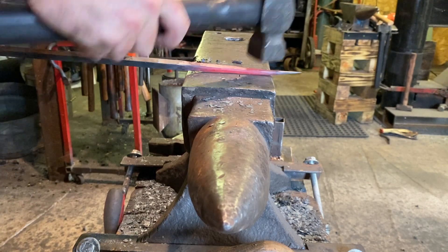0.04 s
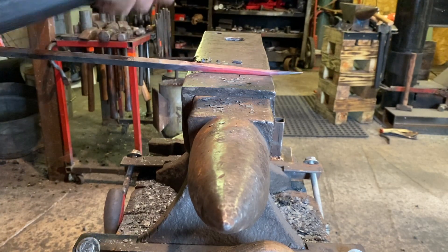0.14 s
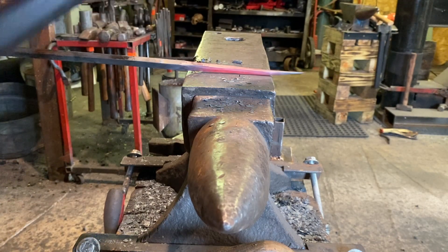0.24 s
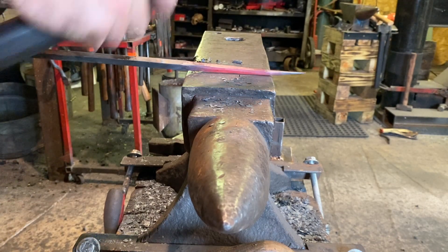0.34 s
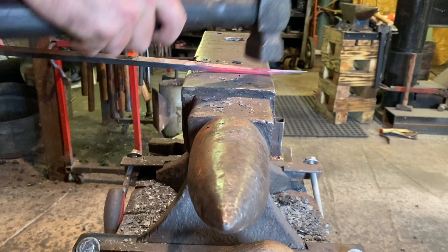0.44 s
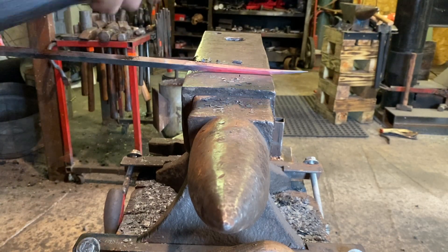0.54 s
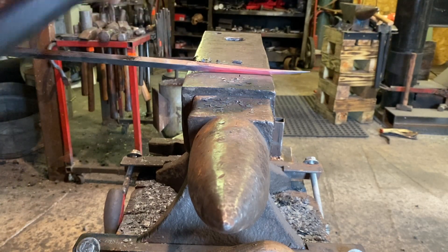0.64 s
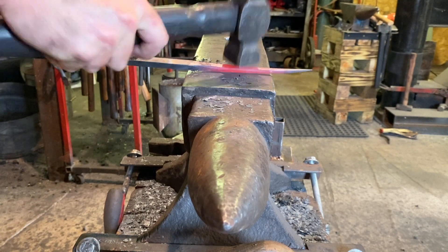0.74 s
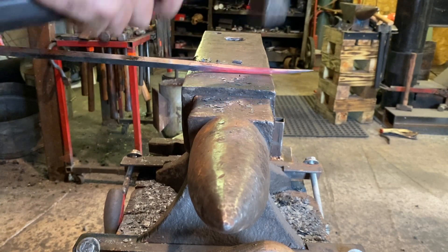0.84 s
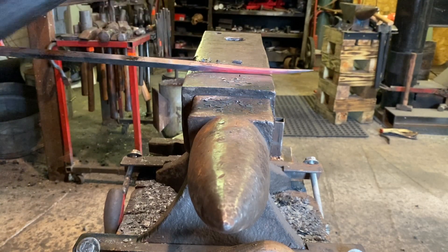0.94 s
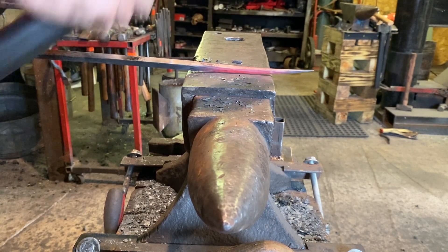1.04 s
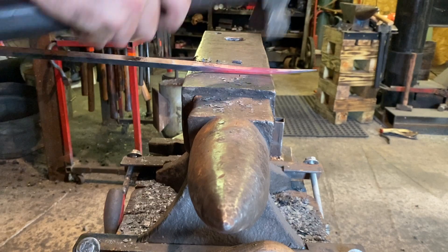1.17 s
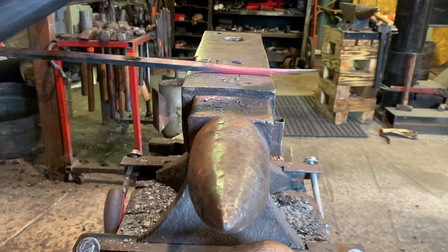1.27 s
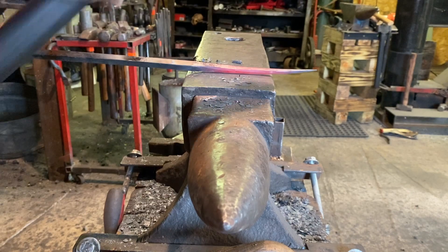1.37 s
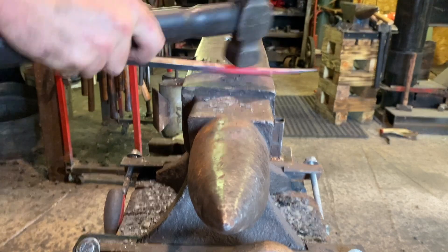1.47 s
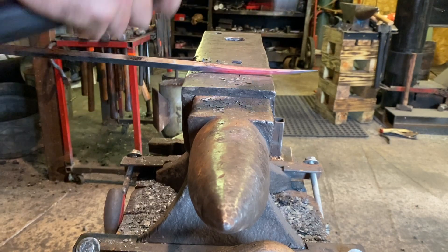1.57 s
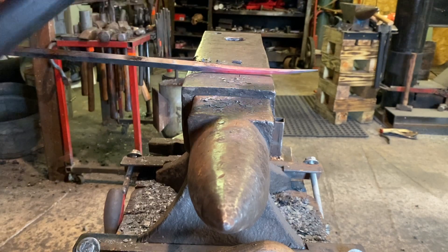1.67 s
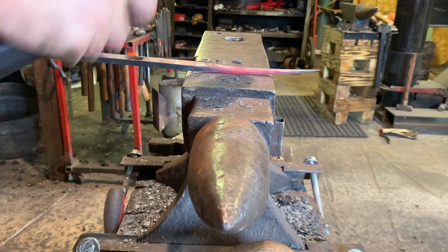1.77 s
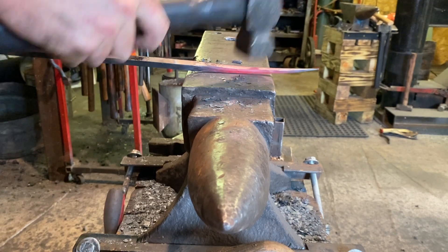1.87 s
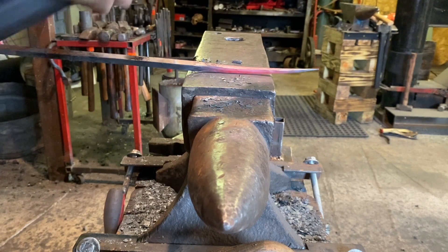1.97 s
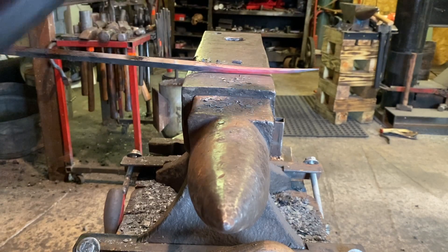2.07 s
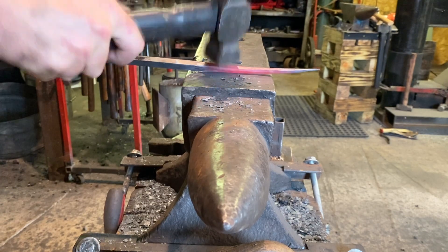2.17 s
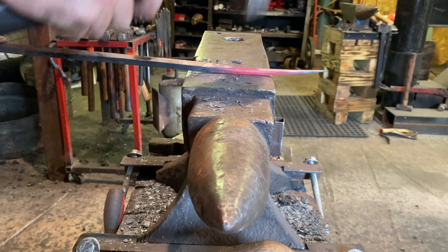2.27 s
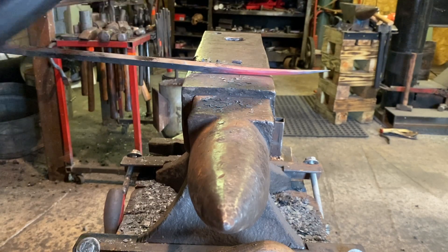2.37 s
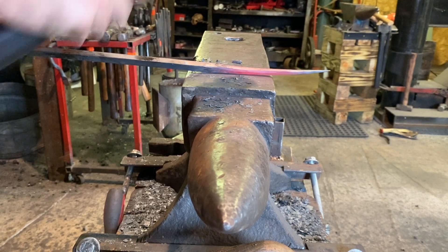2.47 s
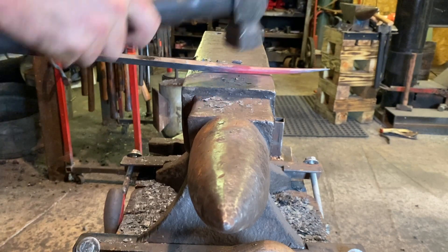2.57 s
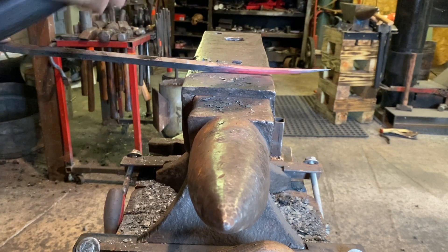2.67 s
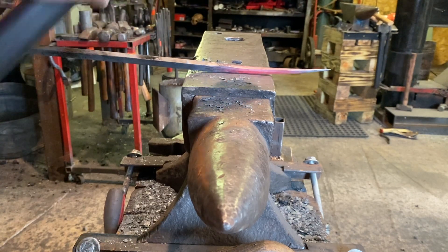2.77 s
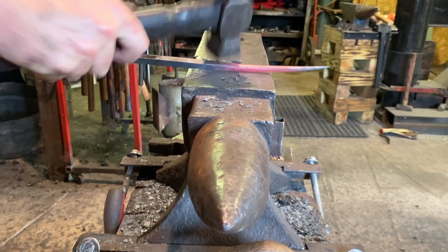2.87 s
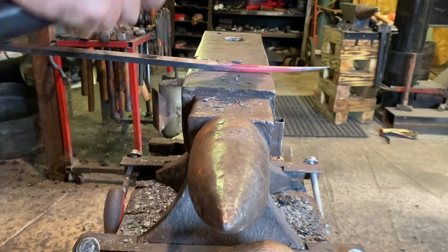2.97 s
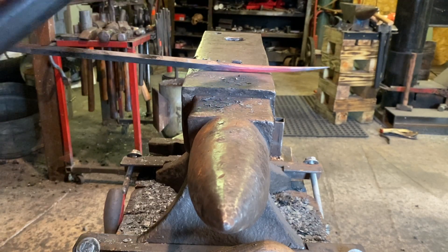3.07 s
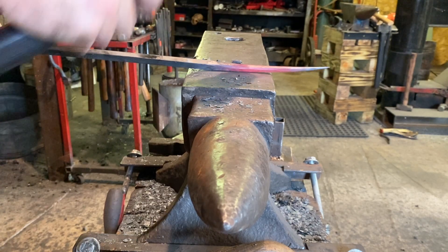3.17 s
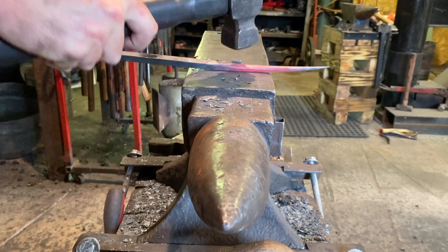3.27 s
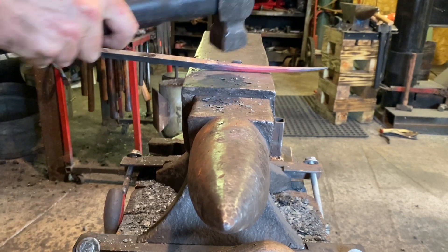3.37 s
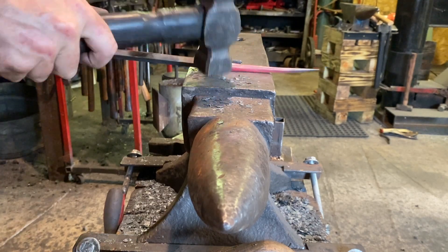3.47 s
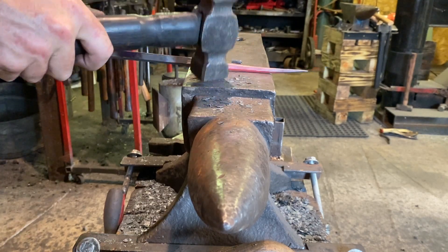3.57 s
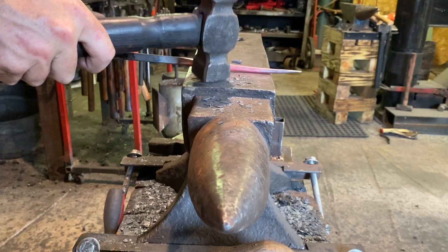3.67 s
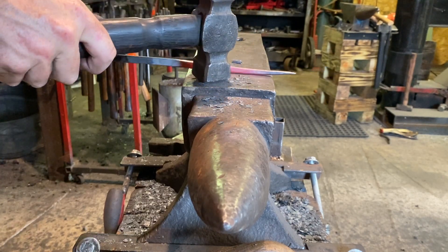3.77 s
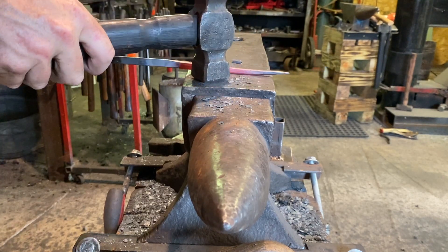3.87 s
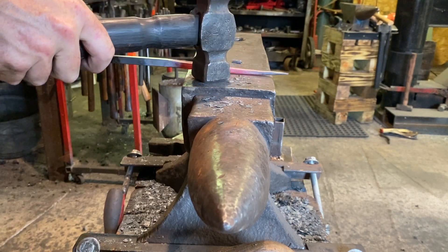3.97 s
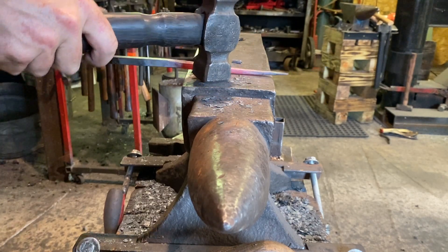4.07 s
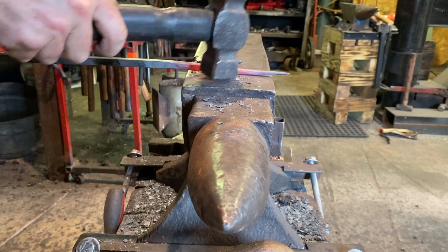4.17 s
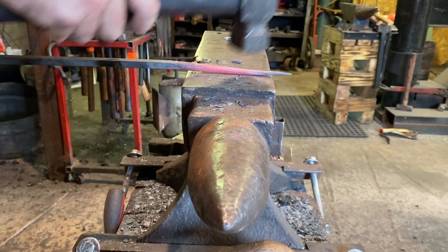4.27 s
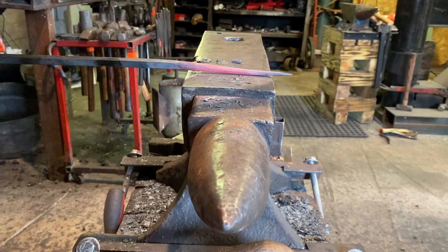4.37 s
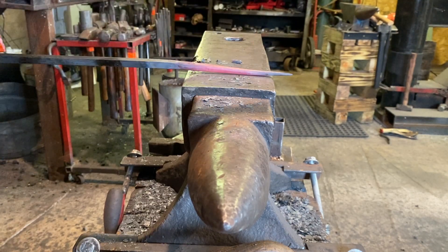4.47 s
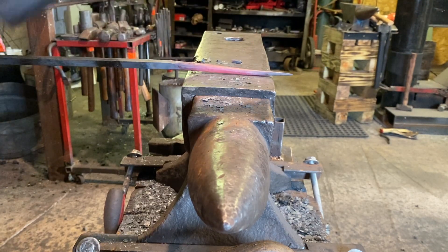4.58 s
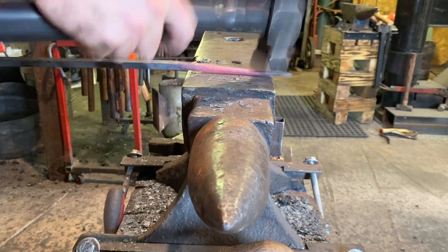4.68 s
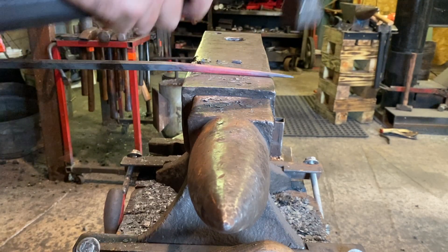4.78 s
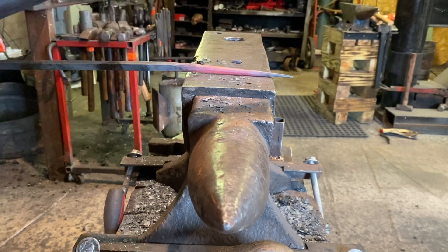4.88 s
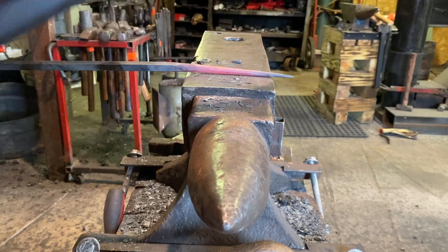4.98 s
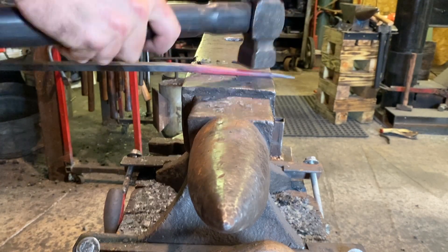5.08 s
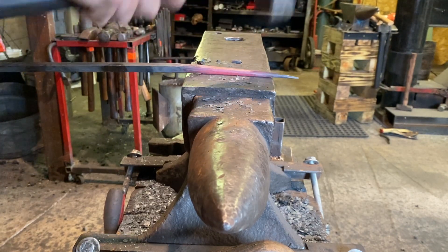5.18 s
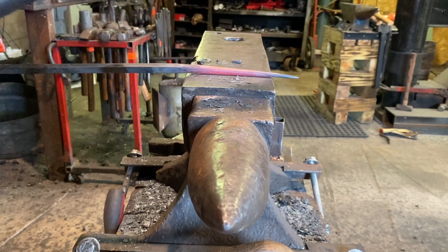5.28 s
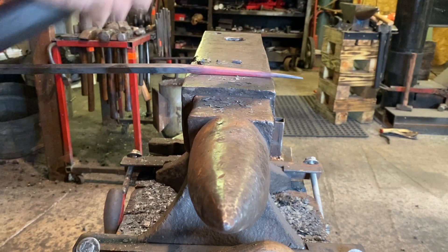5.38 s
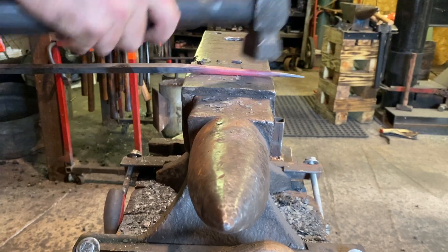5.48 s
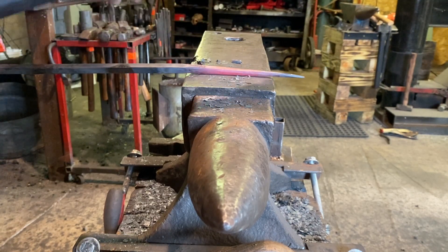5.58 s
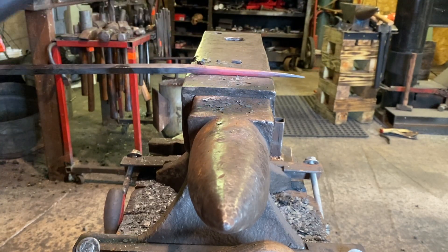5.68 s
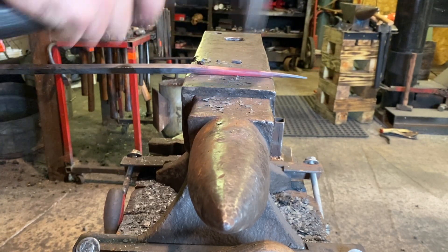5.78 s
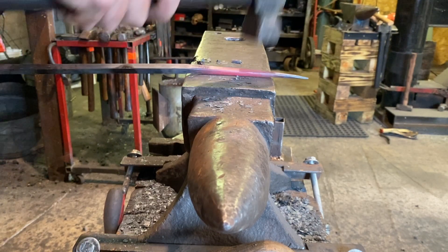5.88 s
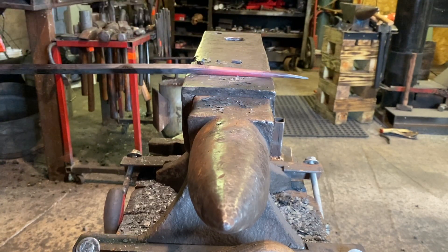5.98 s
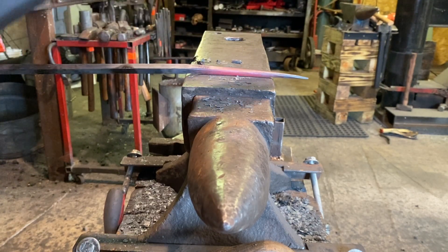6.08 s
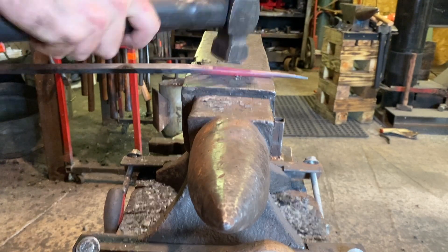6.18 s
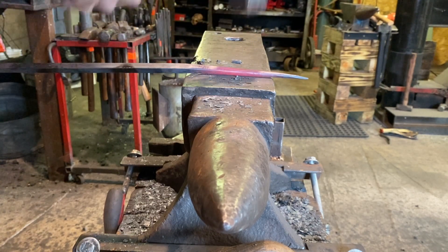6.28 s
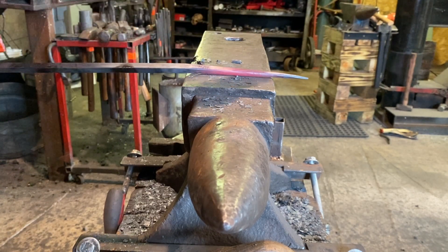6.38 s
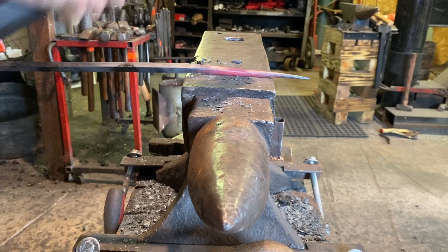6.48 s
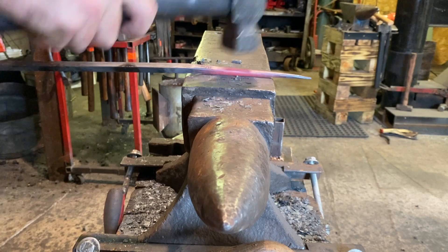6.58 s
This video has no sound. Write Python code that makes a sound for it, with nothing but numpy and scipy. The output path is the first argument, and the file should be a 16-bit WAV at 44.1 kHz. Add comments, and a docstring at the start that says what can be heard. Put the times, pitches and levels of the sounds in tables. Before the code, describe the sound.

Ten evenly spaced hammer blows on hot steel, sharp and heavy with short metallic ring, weaken slightly toward the end. The hammer then taps the bare anvil four times, ringing clearer, each bounce faster and softer. Near-silence follows with faint low thumps, and a second, slightly slower run of six blows begins. Close stereo microphone, hard-surfaced workshop with a short diffuse tail and quiet low room tone.

```python
"""A cluttered forge, heard close to the anvil: a hand hammer draws out a hot steel bar.
Each blow layers a noise crack and its floor reflection, a dead knock, a pitch-falling thud through the
stand, a short clang of decaying anvil modes, and a noise tail in which the workshop answers.
Between two runs the hammer drops on the bare anvil face and bounces ever faster and softer.
Soft low bumps mark the shifting of the bar; a faint steady rumble of coloured noise lies under it all."""
import sys
import numpy as np
from scipy import signal
from scipy.fft import rfft, irfft, next_fast_len
from scipy.io import wavfile
from scipy.ndimage import map_coordinates

SR = 44100
rng = np.random.default_rng(int(sys.argv[2]) if len(sys.argv) > 2 else 0)


def inscribe(sig):
    """Save sig as 16-bit PCM at rate SR to the path in sys.argv[1].

    A 1-D sig is mono; a 2-D sig holds one channel per row.
    Samples are clipped to [-1, 1] before scaling.
    """
    pcm = np.round(np.clip(np.atleast_2d(sig).T, -1, 1) * 32767)
    wavfile.write(sys.argv[1], SR, pcm.astype(np.int16))


N = 292383  # samples in the scene
LIFE = np.arange(int(.8 * SR)) / SR  # time axis of one hit, s

# Blows on the bar; the spot struck decides the bite and how strongly the two clear tones speak:
# start_s, force_db, bite_db, low_tone_db, high_tone_db (the tones are offsets to CLEAR_TONES)
BLOWS = [(0, 2.5, -1, -14.5, 0), (0.3606, -0.5, -4, 2, 8.5), (0.722, 2, -2, -13, 9),
         (1.0805, 1, 1, -17, 3.5), (1.438, 3.5, -2.5, 8.5, -17), (1.793, 2.5, 0.5, 4.5, 9),
         (2.1599, -3.5, -0.5, -3.5, 9), (2.5089, -2, -1, 7, 11), (2.8547, -4.5, -2, 3.5, 6.5),
         (3.2013, -4, -2.5, -10.5, 8.5), (4.6713, 2.5, 1, -3, 3.5), (5.0506, 2, -1, 8, 4),
         (5.42, 3, -4.5, -8.5, 8.5), (5.7906, 2.5, 0, 8.5, 7), (6.1527, -1, 0.5, 4, 7),
         (6.5215, -1.5, 0.5, 1, 10.5)]
# Colour of a blow of ordinary force: freq_hz, gain_db
BLOW_COLOUR = [(90, -3.5), (180, 0), (330, -1.5), (700, 0), (1100, 0.5), (1600, 1), (2000, -1), (2600, 0.5),
               (3800, 0), (5000, 2), (6500, 0)]
# A harder blow sinks deeper into the soft bar and sounds duller: freq_hz, gain_db_per_force_db
DULLING = [(110, -0.42), (300, -0.14), (1100, 0), (1900, -0.32), (3500, -1.19), (4800, -0.86),
           (10000, -0.65)]
# Where the bite lies in the spectrum: freq_hz, share_of_bite_db
BITE = [(2400, 0), (3200, 1), (3900, 1), (4600, 0)]
# After a harder blow the workshop's long tail is shorter
SHORTENING_PER_DB = 0.0548  # exponent of the shortening, per dB of force

# The hammer let fall on the bare face: first contact (s), its force (dB), force lost per bounce (dB)
DROP_S, DROP_DB, BOUNCE_LOSS_DB = 3.448, -3.5, 3
FLIGHT_S, REBOUND = .118, .577  # first flight (s), each flight over the last
# Clear tones: offset at first contact (dB), loss per bounce (dB); then factor on the long tail's length
DROP_TONES_DB, TONES_LOSS_DB, DROP_LINGER = 14, 2, 0.82
# Slower contacts last longer and lose their treble: freq_hz, first_contact_db, change_db_per_bounce
DROP_COLOUR = [(110, -6, 0.5), (300, -1, 0), (750, -3, -0.5), (970, 1, 1.3), (1690, -1.5, -0.6),
               (2420, 0, .3), (3130, 1.5, 0.5), (4010, 3.5, -0.5), (4560, 0, -1.5), (10000, -3, -4.5)]

# Modes of the anvil, damped by bar and stand, before their scatter from hit to hit:
# pitch_hz, level_db, t60_s, bare_face_extra_db
ANVIL_MODES = [(215, -34, .08, -3), (292, -33, .17, -5), (360, -34, .17, -3), (505, -35, .1, -3),
               (650, -29, .11, -3), (829, -32, .15, -3), (955, -43, .17, 13), (1000, -45, .12, 12),
               (1333, -37, .14, 0), (1617, -21, .18, -5), (1759, -24, .1, 0), (1903, -27, .14, 0),
               (1952, -28, .15, 0), (1981, -31, .18, 0), (2075, -33, .17, 2), (2128, -31, .17, 0),
               (2206, -31, .2, 0), (2316, -35, .25, 9), (2515, -36, .2, 0), (3220, -42, .22, 11),
               (3412, -36, .12, 0), (3515, -41, .25, 13), (3640, -39, .16, 10), (3738, -34, .24, 7),
               (3830, -44, .14, 12), (4165, -44, .16, 14), (5233, -40, .2, -4), (7724, -40, .22, 3),
               (9145, -38, .2, 0), (11330, -44, .2, 0)]
# The two clear tones of the hard steel, before each hit's offset: pitch_hz, level_db, t60_s
CLEAR_TONES = [(4136, -35, .24), (7234, -33.5, .17)]
LIFT_OFF_S = .0055  # how long the hammer stays in contact
# Spectrum of the contact crack: freq_hz, gain_db
CRACK_COLOUR = [(40, -30), (150, -20.5), (400, 1), (800, -3), (1200, -3.5), (2000, 2.5), (2800, -1.5),
                (3500, 7.5), (4500, -6), (8800, -2), (11500, -3), (14000, -12), (16000, -19.5)]
# The crack as the floor returns it: freq_hz, gain_db
FLOOR_COLOUR = [(100, 1.5), (300, -1.5), (700, -4), (1200, -5), (1800, -1.5), (3000, -9.5), (12000, -17)]
# Dead knock of the soft hot bar: pitch_hz, level_db, t60_s
KNOCK_MODES = [(313, -18, 0.023), (580, -16.5, 0.026), (669, -11.5, .016)]

# Long tail of the workshop, before each hit's length factor: freq_hz, t60_s
WORKSHOP_DECAY = [(80, 1.15), (300, 0.6), (1000, 0.7063), (2000, 0.68), (4000, 0.71), (7500, 0.68),
                  (11000, 0.4567), (16000, 0.3)]
# Spectrum of the workshop's wash: freq_hz, gain_db
WALL_COLOUR = [(30, -29), (80, -21.5), (180, -26.5), (300, -16.5), (550, -21), (850, -19), (1250, -23.5),
               (2100, -13.5), (2800, -24.5), (3700, -23.5), (4600, -32.5), (9000, -32.5), (12500, -32),
               (16000, -47)]
# Uneven colour of the workshop's wash in the treble: depth (dB), spacing (Hz)
RIPPLE_DB, RIPPLE_HZ = 3, 110

# Soft low bumps while the bar is shifted: start_s, level_db
BUMPS = [(4.479, -51), (4.545, -39.5), (4.594, -32.5), (4.944, -39)]
# Spectrum of the still workshop, before its overall level: freq_hz, gain_db
ROOM_COLOUR = [(15, -64.5), (25, -30), (70, 7), (123, -16), (145, 3.5), (185, -8.5), (263, 0), (293, -6),
               (439, -0.5), (575, -9.5), (3620, -26.5), (16000, -49)]
# How alike the two sides of the noise are: freq_hz, correlation
SIDE_LIKENESS = [(100, .92), (300, 0.8), (900, 0.1), (2000, 0.34), (4200, 0.8), (6000, 0.82)]
# Balance of the two sides: freq_hz, left_minus_right_db
SIDE_LEAN = [(100, -0.5), (380, -2), (900, 0.5), (1700, -0.5), (2600, 1.5), (5000, 6), (7000, 4),
             (8000, -5.3), (12000, 0)]


def hammering(crack_db=-7, thud_db=-28, knock_delay=.002):
    """Every contact drives the same anvil and room; force and spot change its colour."""
    out = np.zeros((2, N))
    usual_contact, usual_paths = pair(len(LIFE)), pair(len(LIFE))
    upper_modes, uneven = shimmer(), ripple()
    # the steel rings freely once the hammer lifts off
    tones = np.array([ring(hz, t60, 0.00054, LIFT_OFF_S)
                      for hz, _, t60, *_ in ANVIL_MODES + CLEAR_TONES])
    body = knock(knock_delay) + amp(thud_db) * thud()
    for start_s, force_db, colour, tone_dbs, linger, bare in blows() + bounces():
        modes = struck_modes(tone_dbs, bare)
        contact = amp(crack_db) * with_floor(crack(varied(usual_contact)))
        steel = clang(modes, tones, upper_modes, bare)
        answer = workshop(varied(usual_paths), modes, linger, uneven)
        hit = contact + body + steel + answer
        add(out, start_s, amp(force_db) * coloured(hit, colour))
    return out


def blows():
    """Working blows, where force sets colour and tail: start, force, colour, tones, tail factor, bare."""
    def colour(force_db, bite_db):
        return [(hz, along(BLOW_COLOUR, hz) + force_db * along(DULLING, hz) + bite_db * along(BITE, hz))
                for hz in np.geomspace(100, 12000, 40)]
    return [(start_s, force_db, colour(force_db, bite_db), tone_dbs,
             np.exp(-SHORTENING_PER_DB * force_db), False)
            for start_s, force_db, bite_db, *tone_dbs in BLOWS]


def bounces(count=4):
    """The dropped hammer bounces ever faster, softer and duller; rows as for the blows."""
    # each flight is a fixed fraction of the last, so the times form a geometric sum
    times = DROP_S + FLIGHT_S * (1 - REBOUND ** np.arange(count)) / (1 - REBOUND)
    rows = []
    for k, start_s in enumerate(times):
        colour = [(hz, db + slope * k) for hz, db, slope in DROP_COLOUR]
        tone_dbs = [DROP_TONES_DB - TONES_LOSS_DB * k] * len(CLEAR_TONES)
        rows.append((start_s, DROP_DB - BOUNCE_LOSS_DB * k, colour, tone_dbs, DROP_LINGER, True))
    return rows


def crack(grain, length=0.0064, rise=.0005):
    """Scale shatters and steel is squeezed for the few milliseconds of contact: a shaped noise burst."""
    burst = grain * (1 - np.exp(-LIFE / rise)) * np.exp(-(LIFE / length) ** 2)
    return coloured(burst, CRACK_COLOUR)


def with_floor(sound, delay=.0055):
    """The sound and its first reflection, from the floor below the anvil."""
    reflection = coloured(sound, FLOOR_COLOUR)
    return sound + filtered(reflection, lambda hz: np.exp(-2j * np.pi * hz * delay))


def struck_modes(tone_dbs, bare, scatter_db=3.5):
    """The steel's modes for one hit; anvil levels scatter, and the bare face shifts them."""
    modes = [(hz, db + bare * extra + scatter_db * rng.normal(), t60)
             for hz, db, t60, extra in ANVIL_MODES]
    modes += [(hz, db + extra, t60) for (hz, db, t60), extra in zip(CLEAR_TONES, tone_dbs)]
    return modes


def clang(modes, tones, upper_modes, bare, sides_db=2, shimmer_db=-47, shimmer_scatter_db=4,
          bare_shimmer_db=5):
    """Anvil and clear tones ring together under a shimmer of weak upper modes."""
    # each mode reaches the two sides unequally
    mode_dbs = np.array([db for _, db, _ in modes]) + sides_db * rng.standard_normal((2, len(modes)))
    upper_dbs = shimmer_db + bare * bare_shimmer_db
    upper_dbs = upper_dbs + shimmer_scatter_db * rng.standard_normal(len(upper_modes))
    return amp(mode_dbs) @ tones + amp(upper_dbs) @ upper_modes


def shimmer(count=70, low_hz=2400, high_hz=13000, t60=0.3):
    """The many weak upper modes of bar and anvil, one to a row; the higher ones are fainter and shorter."""
    pitches = low_hz * (high_hz / low_hz) ** rng.random(count)
    return np.array([ring(hz, t60 * (low_hz / hz) ** .2, rise=0.0078) * (low_hz / hz) ** .5
                     for hz in pitches])


def ring(hz, t60, rise, delay=0):
    """One mode that starts after a delay, builds up and dies away."""
    t = np.maximum(LIFE - delay, 0)
    return np.sin(2 * np.pi * hz * t) * amp(-60 * t / t60) * (1 - np.exp(-(t / rise) ** 2))


def knock(delay):
    """The soft hot bar answers with a few low modes that die almost at once."""
    return sum(amp(db) * ring(hz, t60, 0.0006, delay) for hz, db, t60 in KNOCK_MODES)


def thud(start_hz=200, end_hz=58, glide=.019, rise=0.01, length=0.047):
    """The stand and floor flex: higher bending waves arrive first, so the pitch sinks."""
    hz = end_hz + (start_hz - end_hz) * np.exp(-LIFE / glide)
    envelope = (1 - np.exp(-LIFE / rise)) * np.exp(-(LIFE / length) ** 4)
    return np.sin(2 * np.pi * np.cumsum(hz) / SR) * envelope


def workshop(grain, modes, linger, uneven, near_db=8, near_t60=0.19, onset=0.0014,
             echo_db=-13, echo_s=0.14, echo_width=0.048, modes_db=18, width_hz=12):
    """Near scatter from tools, a longer tail and a soft far-end return, all tinged by the steel's modes."""
    hz, t, bins = signal.stft(grain, SR, nperseg=256)
    near = amp(near_db - 60 * t / near_t60)
    far = amp(-60 * t / (linger * along(WORKSHOP_DECAY, hz)[:, None]))
    echo_colour = [(900, -16.5), (2100, 1), (3500, -9), (12000, -11.5)]  # freq_hz, gain_db
    echo_gain = amp(echo_db + along(echo_colour, hz))[:, None]
    echo = echo_gain * np.exp(-((t - echo_s) / echo_width) ** 2)
    envelope = np.sqrt(near ** 2 + far ** 2 + echo ** 2)
    tail = signal.istft(bins * envelope, SR, nperseg=256)[1][:, :len(LIFE)]

    def response(f):
        # power of the wash plus a narrow peak at every mode
        peaks = sum(amp(db + modes_db) ** 2 * t60 / (1 + (2 * (f - centre) / width_hz) ** 2)
                    for centre, db, t60 in modes)
        return np.sqrt(amp(along(WALL_COLOUR, f) + uneven(f)) ** 2 + peaks)
    return filtered(tail, response) * (1 - np.exp(-(LIFE / onset) ** 2))


def ripple():
    """A random run of peaks and dips, as dB against frequency; the bass stays even."""
    knots = rng.standard_normal(int(SR / RIPPLE_HZ))

    def uneven(hz):
        depth_db = RIPPLE_DB * np.clip(hz / 2000 - 1 / 2, 0, 1)
        return depth_db * map_coordinates(knots, [hz / RIPPLE_HZ], mode="nearest")
    return uneven


def varied(usual):
    """Half the power is shared by all hits, half is new: the spot shifts a little each time."""
    return (usual + pair(len(LIFE))) / np.sqrt(2)


def bumps(bump_hz=75, rise=0.01, t60=0.12):
    """Dull knocks of the shifted bar, each a single low decaying tone."""
    out = np.zeros((2, N))
    for start_s, level_db in BUMPS:
        add(out, start_s, amp(level_db) * ring(bump_hz, t60, rise))
    return out


def room_tone(level_db=-63):
    """The faint steady rumble of the workshop, as coloured noise."""
    return amp(level_db) * unit(coloured(pair(N), ROOM_COLOUR))


def pair(size):
    """Stereo noise whose left-right likeness depends on frequency, nearly mono in the bass."""
    def mid_side(hz):
        turn = np.arccos(np.clip(along(SIDE_LIKENESS, hz), -1, 1)) / 2
        return np.array([np.cos(turn), np.sin(turn)])
    mid, side = filtered(rng.standard_normal((2, size)), mid_side)
    return np.array([mid + side, mid - side])


def coloured(x, points):
    """Causal, minimum-phase filter with the gain of (Hz, dB) points."""
    def response(hz):
        # folding the cepstrum forward in time gives the minimum phase
        cepstrum = irfft(np.log(amp(along(points, hz))))
        half = len(cepstrum) // 2
        cepstrum[1:half] *= 2
        cepstrum[half + 1:] = 0
        return np.exp(rfft(cepstrum))
    return filtered(x, response)


def filtered(x, response):
    """Multiply the spectrum of x by a complex response of frequency."""
    n = x.shape[-1]
    m = next_fast_len(n + SR // 8)  # padded so that tails do not wrap
    return irfft(rfft(x, m) * response(np.fft.rfftfreq(m, 1 / SR)), m)[..., :n]


def along(points, hz):
    """Read (Hz, value) points on a log frequency axis."""
    f, v = np.transpose(points)
    return np.interp(np.log(hz + 1), np.log(f), v)


def amp(db):
    """Decibels to gain."""
    return 10 ** (np.asarray(db) / 20)


def unit(x):
    """Scale to rms 1."""
    return x / np.sqrt(np.mean(x ** 2) + 1e-20)


def add(track, start_s, sound):
    """Mix a sound into the track from its start time."""
    start = max(round(start_s * SR), 0)
    track[:, start:start + sound.shape[-1]] += sound[..., :N - start]


def scene():
    """Hammer and anvil over the quiet room."""
    return hammering() + bumps() + room_tone()


def record(dry, split_hz=6300, in_phase_hz=6900, lag=0.00023, low_cut_hz=30, top_hz=16300):
    """Round the peaks, cut the deepest bass; above the split the left feeds both sides, apart in time."""
    dry = dry / (1 + (dry / .9) ** 6) ** (1 / 6)
    dry = signal.sosfilt(signal.butter(2, low_cut_hz, "high", fs=SR, output="sos"), dry)
    sides = np.array([[.5], [-.5]])

    def crossfade(hz):
        return np.clip((hz - split_hz) / 600 + .5, 0, 1) * np.pi / 2

    def spread_treble(hz):
        # the lag (s) parts the sides, which meet in phase at in_phase_hz
        return np.sin(crossfade(hz)) * np.exp(-2j * np.pi * sides * lag * (hz - in_phase_hz))

    def balance(hz):
        # side balance and a steep cut above top_hz
        return amp(sides * along(SIDE_LEAN, hz)) / (1 + (hz / top_hz) ** 100)
    low = filtered(dry, lambda hz: np.cos(crossfade(hz)))
    high = filtered(dry[0], spread_treble)
    return filtered(low + high, balance)


dry = scene()
out = record(dry)
inscribe(out)
```